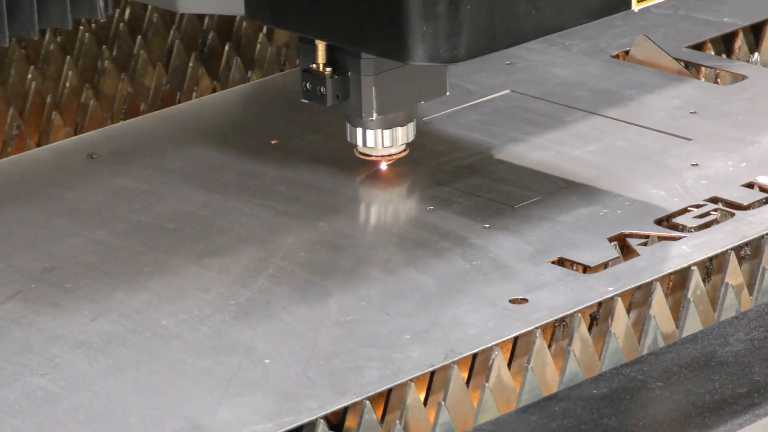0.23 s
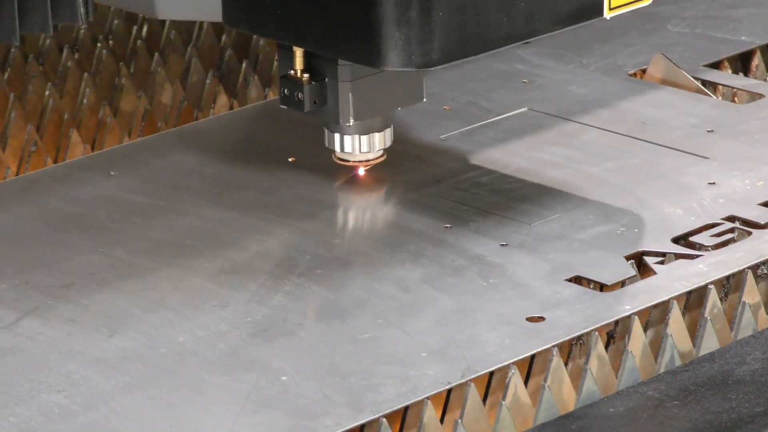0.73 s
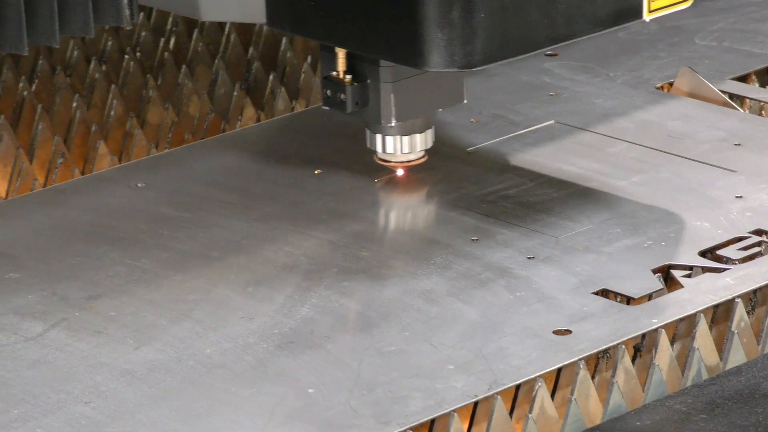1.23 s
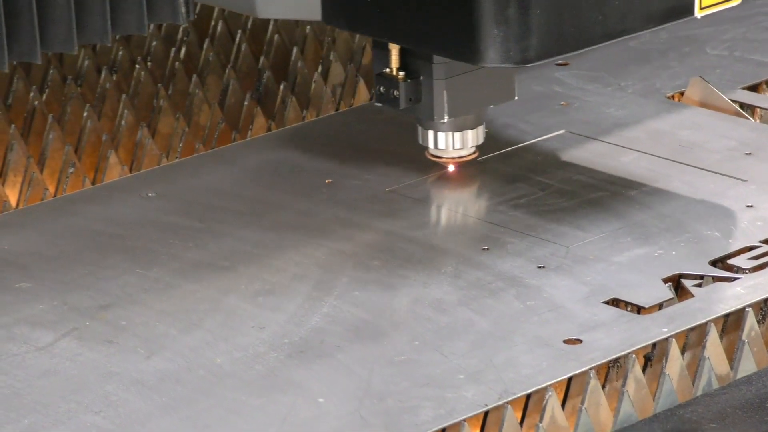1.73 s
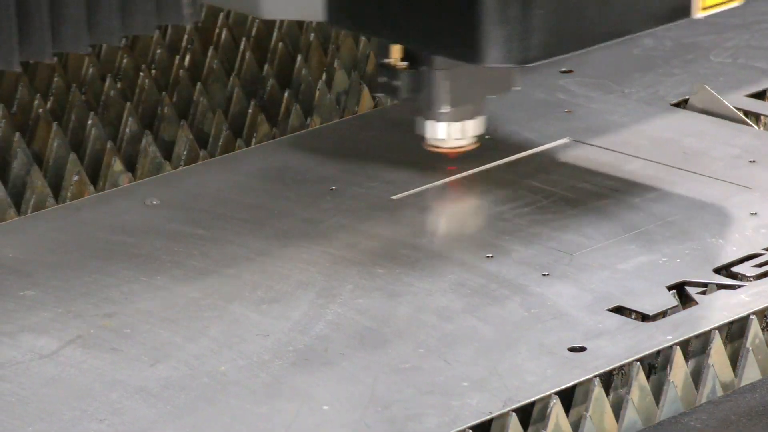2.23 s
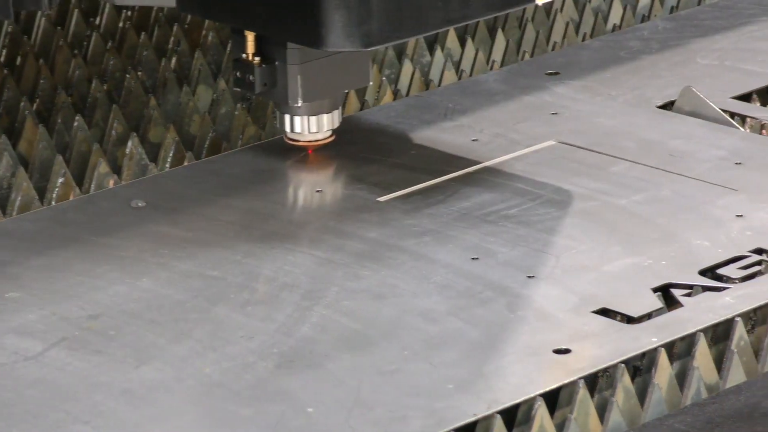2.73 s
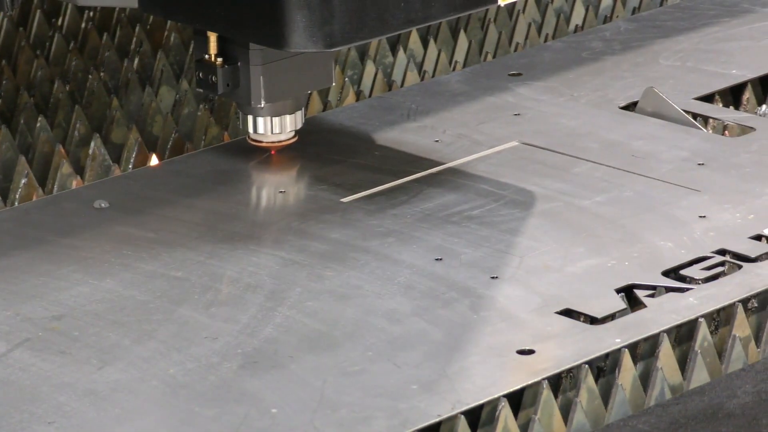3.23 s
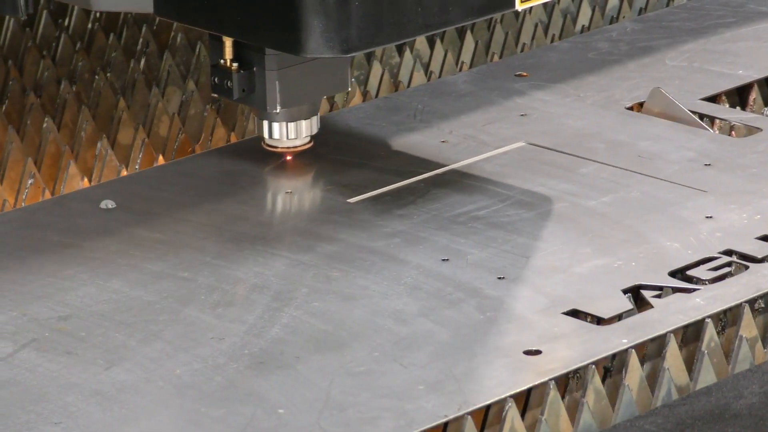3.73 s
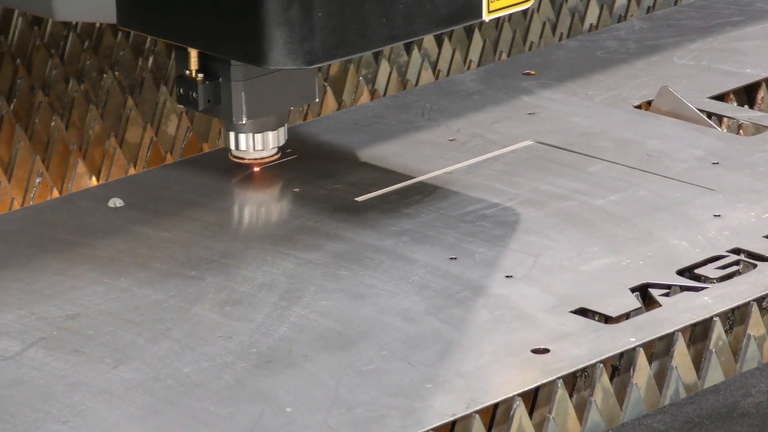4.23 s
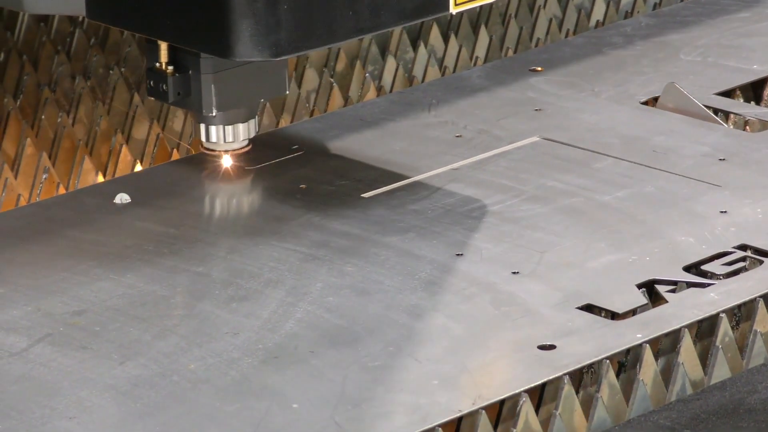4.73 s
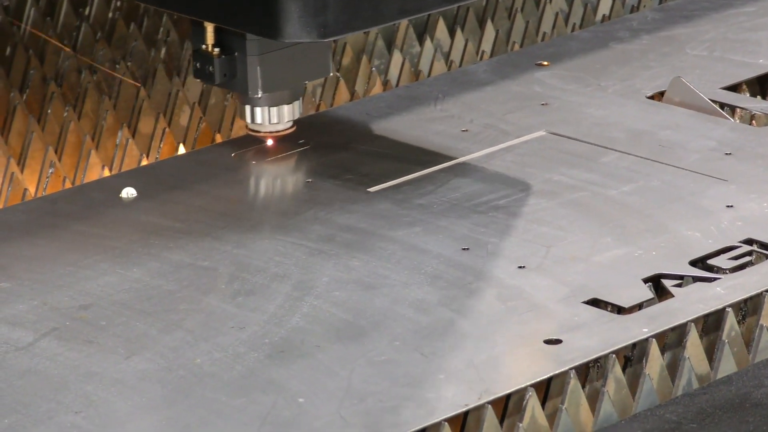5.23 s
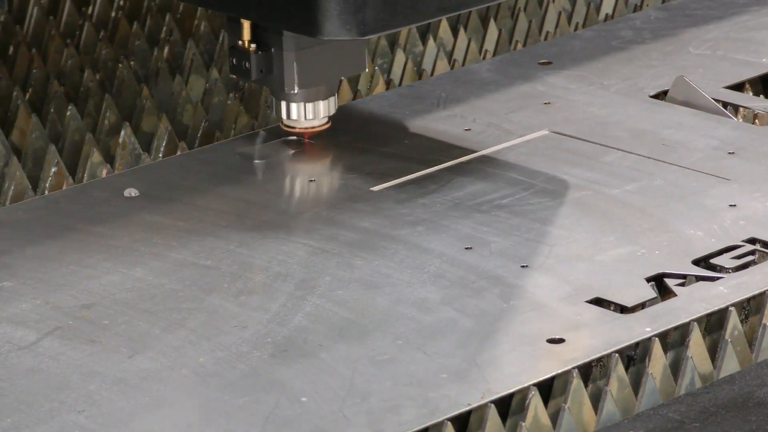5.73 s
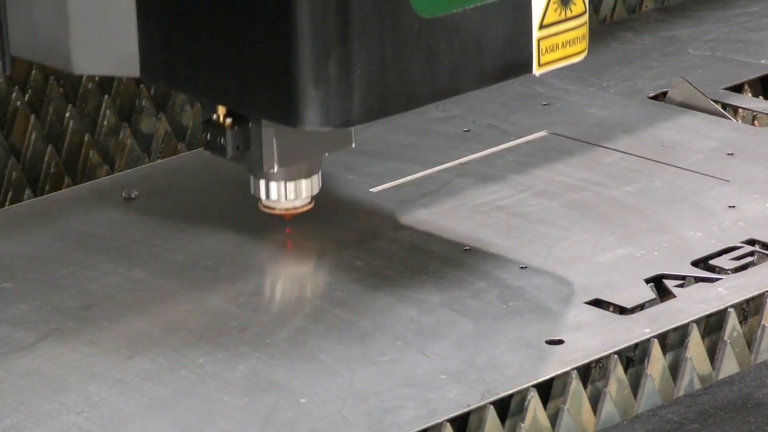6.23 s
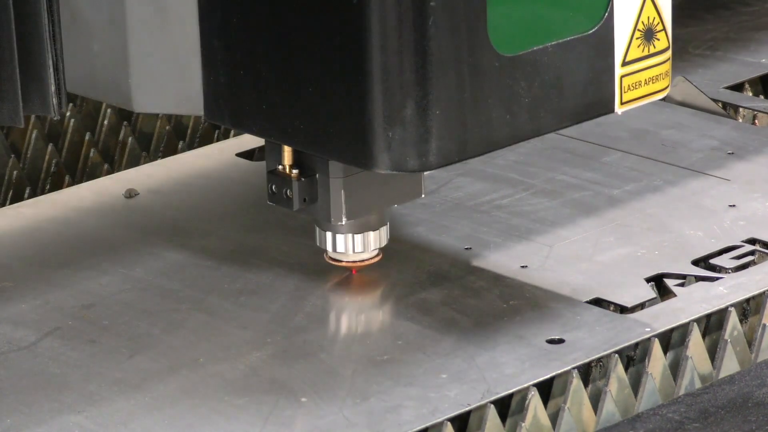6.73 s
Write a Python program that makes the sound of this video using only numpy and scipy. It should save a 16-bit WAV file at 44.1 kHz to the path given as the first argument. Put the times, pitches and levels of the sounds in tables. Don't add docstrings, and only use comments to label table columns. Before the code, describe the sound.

Bright, steady gas hiss from a laser cutter working sheet steel, with knocks as the head resettles and a clack as the gas briefly stops.

```python
import sys
import numpy as np
from scipy import signal
from scipy.fft import rfft, irfft, next_fast_len
from scipy.io import wavfile
from scipy.ndimage import uniform_filter1d, map_coordinates

SR = 44100
rng = np.random.default_rng(int(sys.argv[2]) if len(sys.argv) > 2 else 0)


def convert_level_to_amplitude(level_db):
    exponent = np.asarray(level_db, float) / 20
    return 10 ** exponent


def put_to_file(sound):
    columns = np.atleast_2d(sound).T
    safe = np.clip(columns, -1, 1)
    whole_steps = np.round(safe * 32767)
    wavfile.write(sys.argv[1], SR, whole_steps.astype(np.int16))


N = 308259

# t/s, level/dB
JET_LEVEL = [(0, -29.5), (.8, -31), (2.0, -29.5), (2.15, -30), (2.3, -32.5), (2.48, -32), (2.52, -36.5),
             (2.7, -35), (2.8, -31), (3.2, -32), (3.8, -31), (4.4, -31.5), (5.65, -31), (5.72, -31.5),
             (5.98, -33.5), (6.17, -36), (6.31, -35), (6.79, -29.5)]
# t/s, level/dB, rise/s, fall/s
GAS_KICKS = [(.86, 1, .06, 0.11), (2.247, 5.5, 0.054, .01), (2.537, 5, 0.013, .012), (3.43, 3, 0.037, .02),
             (3.456, -2, .015, .03), (5.788, -3, 0.025, .008), (5.803, 4.5, .01, 0.15),
             (5.906, -1, .025, .008), (6.025, 4.5, .03, .015), (6.11, 2, .012, .012), (6.95, -1.5, .15, .3)]
# t/s, level/dB
BLEED_DOWN = [
    [(2.699, -1.5), (2.707, -9), (2.758, -11), (2.766, 0)],
    [(6.322, -0.5), (6.347, -15), (6.47, -18), (6.52, -33), (6.722, -46), (6.738, -6), (6.79, 0.5)],
]
# t/s, share/1
HEAD_LIFT = [(2.2, 0), (2.27, 1), (2.69, 1), (2.71, 0), (5.85, 0), (5.93, 1), (6.32, 1), (6.335, 0)]
# f/Hz, density/dB
FIZZ_SPECTRUM = [(5400, -35), (9200, -5.5), (10600, 2.5), (12500, 1), (13700, 0.5), (15200, 4.5),
                 (16500, -10), (20000, -28)]
# f/Hz, density/dB
FREE_JET_SPECTRUM = [(9000, -40), (12000, -7), (13500, -6), (16500, 0), (20000, -20)]
# f/Hz, density/dB
SPLASH_SPECTRUM = [(4200, -30), (5700, -8), (6300, -3), (6900, -1.5), (7500, -2.5), (8500, 1), (9800, -4.5),
                   (12700, -24), (20000, -92)]
# t/s, turn/s, roar level/dB, rasp level/dB, edge level/dB
PATH_LEGS = [(0, 0, -43, -46, -47), (.48, .08, -41.5, -46, -44.5), (.82, .12, -42.5, -40, -43.5),
             (1.3, .3, -38.5, -43.5, -42.5), (1.65, 0.24, -39.5, -45, -44.5),
             (2.25, 0.027, -51, -49, -44.5), (2.38, 0.14, -42.5, -46.5, -45.5), (2.55, .06, -45, -50, -48),
             (2.77, 0.091, -37, -37.5, -42.5), (3.12, 0.22, -38, -36.5, -42), (3.6, 0.34, -35, -41, -44),
             (4.4, .3, -36, -38.5, -43.5), (4.78, 0.35, -42, -40.5, -39.5), (5.55, .15, -41, -37.5, -41.5),
             (5.8, .02, -41, -37, -42), (5.9, 0.032, -44, -45, -45), (5.95, .03, -38, -40, -41.5),
             (6.04, .03, -42, -43, -44.5), (6.33, .02, -35.5, -34.5, -40), (6.44, .04, -32.5, -33, -40.5),
             (6.75, 0.073, -40.5, -40.5, -46), (6.84, 0.038, -42.5, -46.5, -45)]
# f/Hz, density/dB
ROAR_SPECTRUM = [(420, -38), (720, -10.5), (843, -7), (916, -7), (1000, -1), (1190, 1.5), (1790, -8),
                 (1850, -7), (2400, -24), (4070, -120)]
# f/Hz, density/dB
RASP_SPECTRUM = [(1100, -38), (1750, -8), (2000, -1.5), (2600, 1), (3200, 0), (3800, -3.5), (4300, -10),
                 (6000, -21), (12000, -120)]
# f/Hz, density/dB
EDGE_SPECTRUM = [(2500, -29), (3800, -4.5), (4300, -2.5), (5100, -0.5), (5600, -4), (6300, -19),
                 (9000, -52), (16000, -120)]
# f/Hz, width/Hz, level/dB
SHEET_MODES = [(1530, 260, 0), (2400, 87, 1.5), (3186, 200, -1.5), (5200, 530, -1.5)]
# t/s, level/dB, rise/s, fall/s
SHEET_SWELLS = [
    (.98, 12.5, 0.3, 0.51),
    (1.25, 7.5, .3, .3),
    (3.25, 5, 0.54, .6),
    (4.95, 10.5, 0.25, 1.2),
    (5.8, 21.5, 0.014, 0.11),
    (6.0, 8, .07, 0.55),
]
# f/Hz, density/dB
FAN_SPECTRUM = [(15, -71), (25, -44), (64, -54), (113, -15.5), (160, -14.5), (182, -10), (290, -10),
                (355, -2.5), (376, -5), (461, 1), (549, -7), (800, -6.5), (1040, -14.5), (1760, -120)]
# f/Hz, level/dB
FAN_LINES = [(96, -22), (120, -14), (192, -7.5), (240.6, -14), (383.8, 2)]
# f/Hz, density/dB
GANTRY_SPECTRUM = [(15, -78), (25, -52), (90, -28), (190, -11), (250, -9), (326, -9), (376, -2.5),
                   (549, -8), (800, -14.5), (1040, -28), (1760, -120)]
# t/s, level/dB, rise/s, fall/s
GANTRY_SURGES = [(.85, -3.5, .4, 0.26), (2.27, -8.5, 0.038, .2), (2.515, 5.5, .07, 0.054),
                 (2.755, 18.5, 0.25, 0.1), (3.0, 2.5, 0.27, .2), (5.5, -0.5, .1, 0.22),
                 (5.82, -4.5, 0.027, .25), (6.078, 4.5, 0.033, 0.093), (6.314, 14.5, .15, 0.031),
                 (6.47, 5.5, 0.078, 0.16), (6.735, 17, 0.35, 0.12), (6.99, 2, 0.19, .1)]
# t/s, peak level/dB, t60/s
LANDING_KNOCKS = [
    (2.694, -26, 0.05),
    (2.7554, -15.5, 0.051),
    (2.772, -16.5, 0.04),
    (6.727, -17.5, 0.091),
    (6.742, -18, 0.05),
]
# f/Hz, width/Hz, level/dB
BED_MODES = [(340, 57, -2.5), (550, 200, -0.5), (820, 310, 1)]
# t/s, share/1
TRAVEL_SHARE = [(6.33, 0), (6.4, 1), (6.72, 1), (6.78, 0)]
# t/s, level/dB
DRIVE_LEVEL = [(6.3, -60), (6.34, -35), (6.45, -34), (6.5, -29.5), (6.56, -37.5), (6.63, -36), (6.7, -39),
               (6.75, -39), (6.8, -60)]
# f/Hz, density/dB
DRIVE_SPECTRUM = [(900, -40), (1800, -13), (3300, -5), (4500, -18), (5200, -14), (6700, -7.5), (8000, -16),
                  (10000, -26), (12500, -24), (13700, -48), (15700, -36)]
# f/Hz, level/dB, strongest t/s, slope before/(dB/s), slope after/(dB/s)
SERVO_WHISTLES = [(8532, -37, 6.45, 5, -1), (12505, -44, 6.52, 50, 50), (14670, -39, 6.515, 600, 55),
                  (15268, -48, 6.5, 60, 55)]
# t/s, level/dB, half length/s
SERVO_TUGS = [
    (6.37, -9, .02),
    (6.405, 1.5, .011),
    (6.45, -0.5, .014),
    (6.49, -10, 0.022),
    (6.525, -2, 0.016),
    (6.565, -10, .02),
    (6.615, -6, .022),
    (6.648, -12, .015),
    (6.696, -10, 0.017),
]
# f/Hz, level/dB
FRAME_RINGS = [(3171, -39), (3456, -47), (3736, -56)]
# t/s, peak level/dB, tilt/(dB/octave), t60/s
VALVE_CLACKS = [
    (6.3227, -10, -6, 0.056),
    (6.4938, -22.5, -2, 0.073),
    (6.6361, -21, -10, 0.036),
]
# f/Hz, width/Hz, level/dB
VALVE_MODES = [(1300, 540, -11.5), (3700, 760, -0.5), (6740, 1140, 2.5), (8600, 1700, 1), (11360, 840, 2)]


def unit(x):
    return x / np.sqrt(np.mean(x ** 2) + 1e-20)


def curves(rows):
    if np.ndim(rows[0]) == 2:
        rows = np.concatenate(sorted(rows, key=lambda r: r[0][0]))
    knot_s, *columns = np.transpose(rows)
    knot_s = np.maximum.accumulate(knot_s)
    t = np.arange(N) / SR
    return [uniform_filter1d(np.interp(t, knot_s, c), size=400) for c in columns]


def bumps(rows):
    t = np.arange(N) / SR
    return sum(np.interp(t, [s - rise, s, s + fall], [0, db, 0]) for s, db, rise, fall in rows)


def swells(rows, t):
    return np.sqrt(sum(convert_level_to_amplitude(2 * db) * np.exp(-2 * ((t - s) / half_s) ** 2) for s, db, half_s in rows))


def wobble(rate_hz):
    knots = rng.standard_normal(int(N * rate_hz / SR) + 4)
    return map_coordinates(knots, [np.arange(N) * rate_hz / SR])


def filtered(x, response):
    m = next_fast_len(len(x) + 8192)
    return irfft(rfft(x, m) * response(np.fft.rfftfreq(m, 1 / SR)), m)[:len(x)]


def rush(spectrum, patchy_db, flutter_db):
    z = signal.stft(rng.standard_normal(N), nperseg=512)[2]
    field = uniform_filter1d(rng.standard_normal(z.shape), size=8, axis=0)
    field = uniform_filter1d(field, size=10, axis=1)
    x = signal.istft(z * convert_level_to_amplitude(patchy_db * unit(field)), nperseg=512)[1][:N]
    x = x * convert_level_to_amplitude(flutter_db * wobble(60))
    f, db = np.transpose(spectrum)
    return unit(filtered(x, lambda hz: convert_level_to_amplitude(np.interp(np.log(hz + 1), np.log(f + 1), db))))


def fuzzy_line(hz, width_hz):
    return unit(filtered(rng.standard_normal(N), lambda f: np.exp(-((f - hz) / width_hz) ** 2)))


def resonances(modes):
    def response(f):
        return sum((-1) ** k * convert_level_to_amplitude(db) * 1j * f * width / (hz * hz - f * f + 1j * f * width)
                   for k, (hz, width, db) in enumerate(modes))
    return response


def burst(s, t60_s, attack_s, response):
    t = np.arange(SR // 5) / SR
    envelope = convert_level_to_amplitude(-60 * t / t60_s) * (1 - np.exp(-t / attack_s))
    puff = filtered(rng.standard_normal(len(t)) * envelope, response)
    out = np.zeros(N + SR)
    out[round(s * SR):][:len(t)] = puff / np.abs(puff).max()
    return out[:N]


def path():
    rows = []
    old = PATH_LEGS[0][2:]
    for s, turn_s, *new in PATH_LEGS:
        rows += [(s - turn_s / 2, *old), (s + turn_s / 2, *new)]
        old = new
    return curves(rows)


def gantry():
    level_db = -46.5 + bumps(GANTRY_SURGES)
    fan_db = np.minimum(level_db, -44)
    return fan_db, np.sqrt(convert_level_to_amplitude(2 * level_db) - convert_level_to_amplitude(2 * fan_db))


def nozzle():
    bleed_db, = curves(BLEED_DOWN)
    lift, = curves(HEAD_LIFT)
    edge_db = path()[2]
    jet_db = curves(JET_LEVEL)[0] + bumps(GAS_KICKS) + 0.14 * wobble(6.5)
    splash_db = jet_db - 4 + 0.32 * (edge_db - edge_db.mean()) + 0.38 * bleed_db + 0.35 * wobble(8)
    fizz = convert_level_to_amplitude(1.5 - 1.7 * lift) * rush(FIZZ_SPECTRUM, patchy_db=0.4, flutter_db=0.3)
    fizz += convert_level_to_amplitude(2) * lift * rush(FREE_JET_SPECTRUM, patchy_db=-2.0, flutter_db=1.5)
    splash = convert_level_to_amplitude(splash_db) * rush(SPLASH_SPECTRUM, patchy_db=0.7, flutter_db=0.14)
    return convert_level_to_amplitude(jet_db + bleed_db) * fizz + splash


def kerf():
    roar_db, rasp_db, edge_db = path()
    shake = gantry()[1]
    roar_gain = np.hypot(convert_level_to_amplitude(roar_db + 0.62 * wobble(16)), convert_level_to_amplitude(-5.5) * shake)
    rasp_gain = np.hypot(convert_level_to_amplitude(rasp_db + 0.38 * wobble(12)), convert_level_to_amplitude(-8.5) * shake)
    edge_gain = convert_level_to_amplitude(edge_db + bumps(GAS_KICKS) + 0.37 * wobble(12))
    roar = roar_gain * rush(ROAR_SPECTRUM, patchy_db=-0.74, flutter_db=-1.06)
    rasp = rasp_gain * rush(RASP_SPECTRUM, patchy_db=0.4, flutter_db=0.4)
    edge = edge_gain * rush(EDGE_SPECTRUM, patchy_db=0.26, flutter_db=1.0)
    return convert_level_to_amplitude(2.0) * roar + convert_level_to_amplitude(2.5) * rasp + convert_level_to_amplitude(2.5) * edge


def shop():
    fan_db, surge = gantry()
    t = np.arange(N) / SR
    lines = sum(convert_level_to_amplitude(db + 2.5 * wobble(5)) * np.sin(2 * np.pi * hz * t + 0.5 * wobble(5))
                for hz, db in FAN_LINES)
    rumble_gain = convert_level_to_amplitude(fan_db + 1.74 + 1.0 * wobble(7))
    rumble = rumble_gain * rush(FAN_SPECTRUM, patchy_db=0.47, flutter_db=-0.2)
    line_gain = convert_level_to_amplitude(fan_db - 5.5) + convert_level_to_amplitude(-12) * surge
    moving = surge * rush(GANTRY_SPECTRUM, patchy_db=0.5, flutter_db=0.6)
    return rumble + line_gain * lines + moving


def sheet():
    ring = resonances(SHEET_MODES)
    song = unit(filtered(rng.standard_normal(N), lambda f: ring(f) ** 2))
    return convert_level_to_amplitude(-52 + bumps(SHEET_SWELLS)) * song


def landing():
    bed = resonances(BED_MODES)
    return sum(convert_level_to_amplitude(db + 0.5) * burst(s, t60_s, 0.00074, bed) for s, db, t60_s in LANDING_KNOCKS)


def servos():
    moving, = curves(TRAVEL_SHARE)
    drive_db, = curves(DRIVE_LEVEL)
    on = moving > 0
    t = np.flatnonzero(on) / SR
    tones = np.zeros(len(t))
    for hz, db, s, before, after in SERVO_WHISTLES:
        tone_db = db - np.maximum(before * (s - t), after * (t - s))
        tones += convert_level_to_amplitude(tone_db) * np.sqrt(2) * np.sin(2 * np.pi * hz * t + 0.5 * wobble(33)[on])
    whistle = np.zeros(N)
    whistle[on] = swells(SERVO_TUGS, t) * tones
    rings = sum(convert_level_to_amplitude(db) * fuzzy_line(hz, width_hz=60) for hz, db in FRAME_RINGS)
    drive = convert_level_to_amplitude(drive_db) * rush(DRIVE_SPECTRUM, patchy_db=-0.8, flutter_db=0.5)
    return convert_level_to_amplitude(4) * whistle + rings * moving + drive


def valve():
    body = resonances(VALVE_MODES)

    def tilted(tilt_db):
        return lambda f: body(f) * convert_level_to_amplitude(tilt_db * np.log2(f / 5000 + 0.089))

    return sum(convert_level_to_amplitude(db + 5.5) * burst(s - 0.0006, t60_s, 0.0007, tilted(tilt_db))
               for s, db, tilt_db, t60_s in VALVE_CLACKS)


def scene():
    mono = nozzle() + kerf() + sheet() + shop() + servos() + valve() + landing()
    return np.array([mono, mono])


def side_noise():
    side = np.zeros(N + SR)
    length = SR // 24
    cells = rng.uniform([0, -1, 4540, 4540], [N, 1, 15600, 15600], (27, 4))
    for start, scatter, *bands_hz in cells:
        in_band = lambda f: np.abs(f - np.c_[bands_hz]).min(axis=0) < 400
        cell = unit(filtered(rng.standard_normal(length), in_band))
        side[int(start):][:length] += convert_level_to_amplitude(-39.5 + 3.5 * scatter) * cell * np.hanning(length)
    return side[length // 2:][:N]


def top_cut(x):
    return signal.sosfilt(signal.butter(12, 17090, fs=SR, output="sos"), x)


def record(dry):
    side = side_noise()
    soft = dry / (1 + np.abs(dry / 0.38) ** 4) ** 0.25
    band = lambda f: (f < 15745) / np.sqrt(1 + (55 / (f + 1)) ** 4)
    wide = [filtered(x, band) for x in soft + np.array([side, -side])]
    return top_cut(np.array(wide))


dry = scene()
out = record(dry)
put_to_file(out)
```